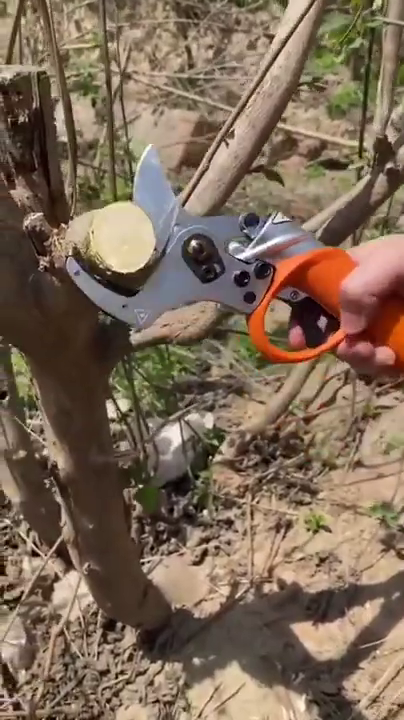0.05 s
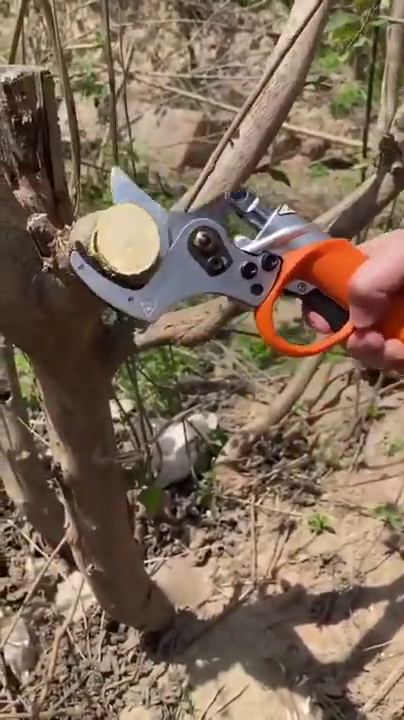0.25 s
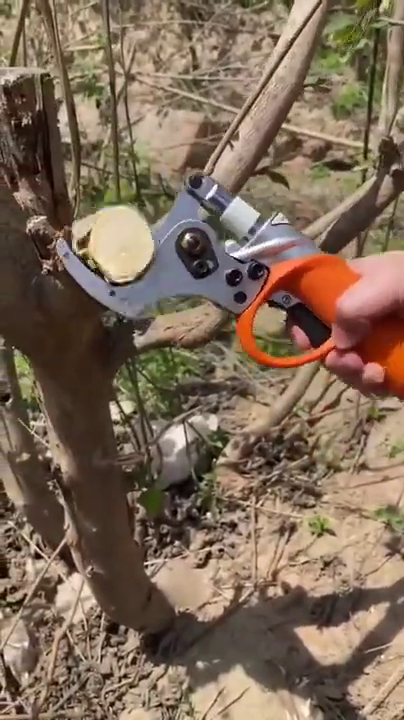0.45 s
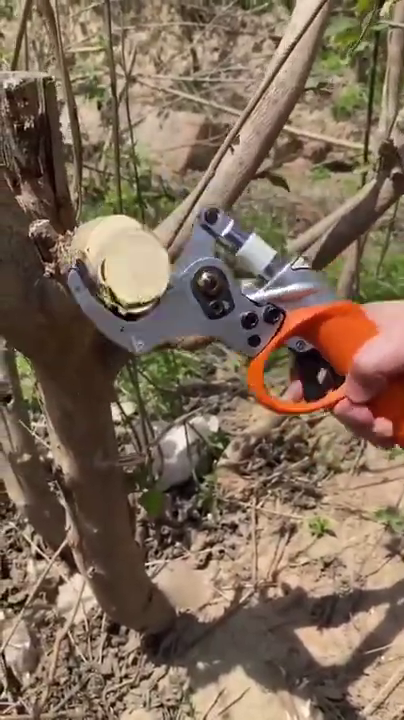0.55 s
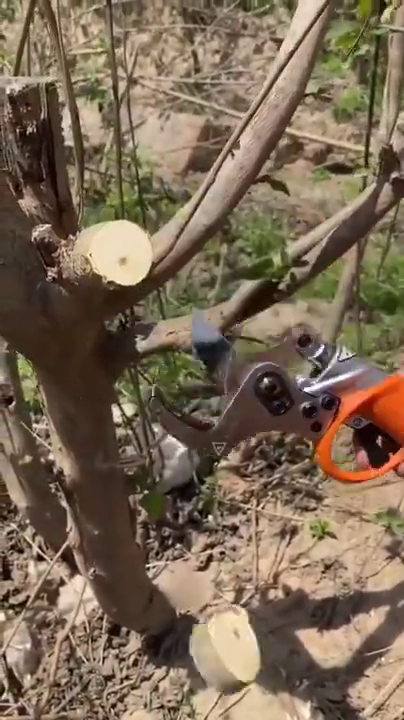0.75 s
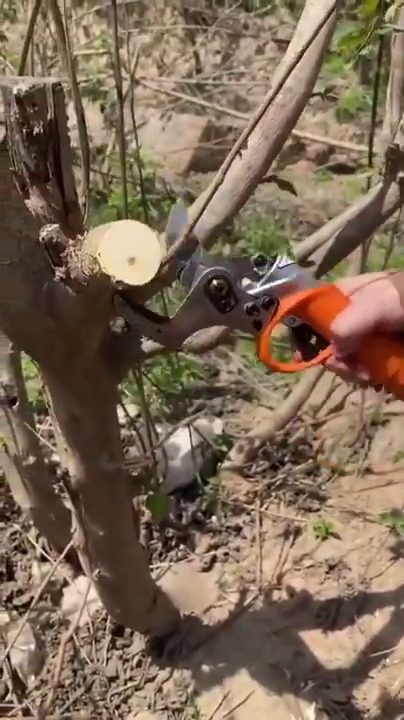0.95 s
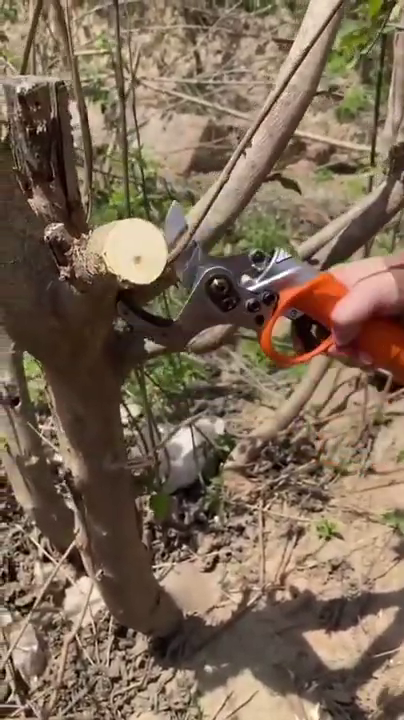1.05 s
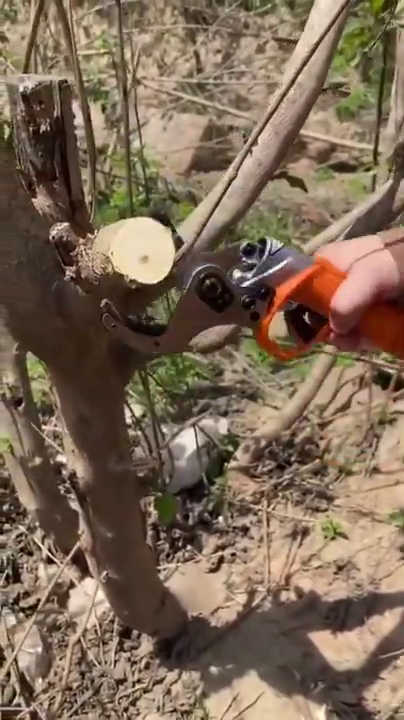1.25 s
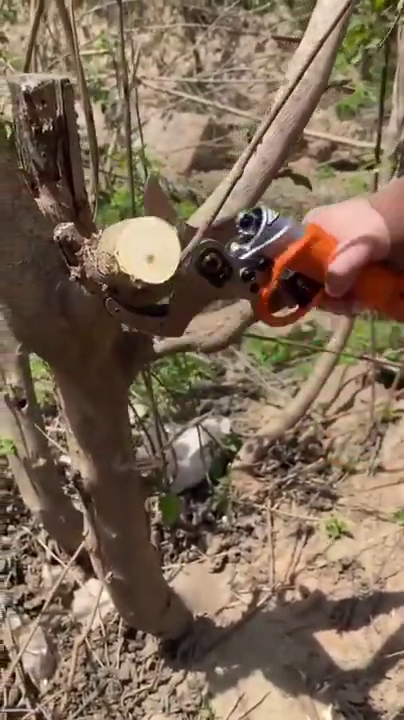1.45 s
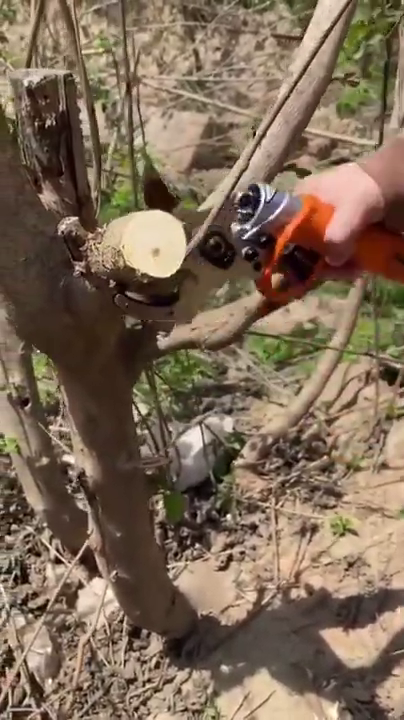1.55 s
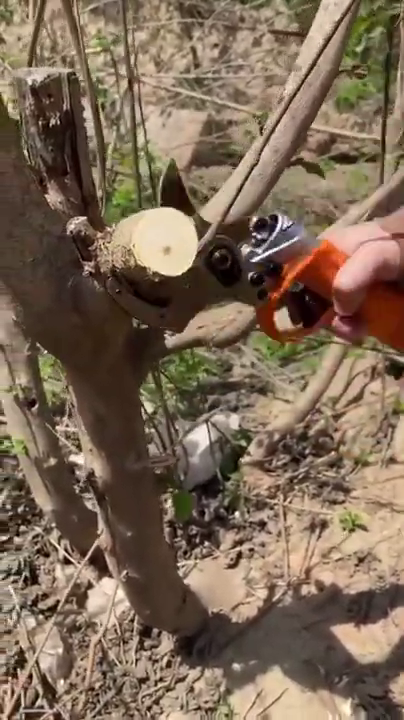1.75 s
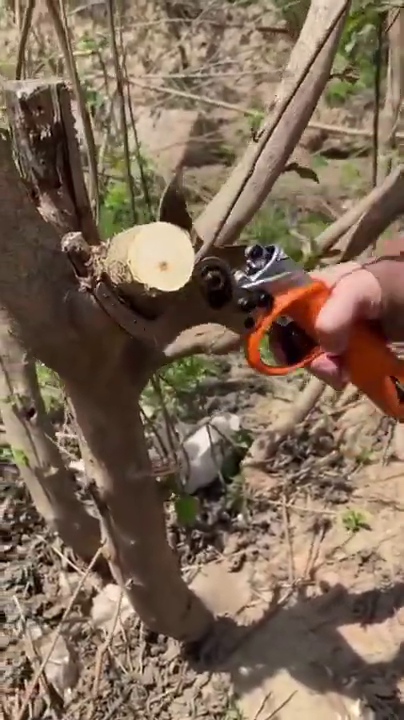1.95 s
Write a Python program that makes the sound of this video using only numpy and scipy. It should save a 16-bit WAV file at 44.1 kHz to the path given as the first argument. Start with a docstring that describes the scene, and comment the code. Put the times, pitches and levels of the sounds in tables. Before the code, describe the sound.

Close by outdoors, a motorised pruner closes with a gear whir and a sinking squeal, snaps the last wood fibres and runs open again. Faint knocks and crunches follow as the cut piece lands on dry ground.

```python
"""An electric pruning shear, close by and outdoors, cuts a stub off a branch. Gear teeth whir in a ringing
housing, the drive whines, the blade sticks and slips in the wood with a sinking squeal, the last fibres
crack, and the blades rub as they run back open. The offcut thuds on dry soil and tumbles, spraying crumbs;
dry litter rustles faintly over a low outdoor rumble."""
import sys
import numpy as np
from scipy.fft import rfft, irfft, next_fast_len
from scipy.io import wavfile
from scipy.ndimage import map_coordinates

SR = 44100
rng = np.random.default_rng(int(sys.argv[2]) if len(sys.argv) > 2 else 0)


def master(y):
    """Save y as 16-bit WAV."""
    cut = np.clip(np.atleast_2d(y).T, -1, 1)
    pcm = np.round(cut * 32767)  # scale
    wavfile.write(sys.argv[1], SR, pcm.astype(np.int16))


N = 88200

# housing resonances (frequency [Hz], width [Hz], gain [dB])
HOUSING_MODES = [(1660, 120, -6), (2154, 200, -2), (2660, 60, -2), (3040, 140, 0.5), (3180, 45, -11.5),
                 (3890, 220, -3.5), (4280, 55, -3), (4670, 230, -1), (6000, 190, -6), (7450, 130, -1.5),
                 (7900, 110, -2.5), (7730, 130, -0.5), (10180, 50, 1)]
# motor drive tones (frequency [Hz], relative level [dB])
DRIVE_TONES = [(8441, -15.5), (10163, -24.5), (14298, -24.5), (15331, -36.5)]
# (frequency [Hz], left-right correlation [-1..1])
SHEAR_COHERENCE = [(100, .85), (300, 0.95), (640, -.1), (1400, -0.067), (2600, 0.46), (6800, 0.44),
                   (15000, 0.68)]
MESH_HZ, SHAFT_HZ = 799.6, 85.55

def gears(stroke, spectrum, jitter, size_db, hiss_db, shaft_db, ring_db, whine_db):
    """Teeth strike unevenly over sliding noise, pulsing with the shaft; housing rings, drive whines."""
    t, count = clock(), 2400
    strikes = (np.arange(count) + jitter * rng.standard_normal(count)) * SR / MESH_HZ
    sizes = amp(size_db * rng.standard_normal((2, count))) * rng.choice([-1, 1], (2, count))
    teeth = np.array([np.bincount(np.abs(strikes).astype(int), row, N)[:N] for row in sizes])
    shaft = np.sin(2 * np.pi * np.cumsum(SHAFT_HZ * (1 + .055 * wobble(25))) / SR)
    sliding = amp(hiss_db) * rng.standard_normal((2, N))
    force = (unit(teeth) + sliding) * amp(shaft_db * shaft + .8 * wobble(130))
    housing = lambda hz: amp(along(spectrum, hz)) * (1 + amp(ring_db) * resonances(HOUSING_MODES, hz))
    whir = stereo(force, housing, SHEAR_COHERENCE)
    whine = sum(amp(db + 2 * wobble(4.7)) * np.sin(2 * np.pi * hz * t + .3 * wobble(23))
                for hz, db in DRIVE_TONES)
    return amp(curves(stroke)[0]) * during(stroke) * (whir + amp(whine_db) * whine)


# (time [s], level [dB])
CLOSING_STROKE = [(.175, -65), (.192, -39), (.203, -38), (.213, -19.5), (.235, -21), (.33, -20), (.45, -21),
                  (.546, -20), (.556, -38.5), (.594, -39.5), (.605, -73.5), (.62, -85)]
OPENING_STROKE = [(.603, -54.5), (.617, -43), (.624, -38.5), (.638, -34), (.644, -24), (.7, -25.5),
                  (.75, -25.5), (.815, -27), (.86, -24), (.89, -29), (.92, -33), (.94, -57.5), (.99, -80)]
# (frequency [Hz], density [dB])
LOADED_SPECTRUM = [(40, -47), (130, -29.5), (300, -13.5), (800, -12.5), (960, -36), (1150, -9.5),
                   (1600, -3), (2400, 2.5), (3200, 2.5), (4000, -1), (4350, -1), (4700, 1.5), (5250, -3.5),
                   (5900, 0.5), (6600, -3.5), (7600, 1), (8400, -11.5), (10200, -11), (12500, -6),
                   (13700, -22.5), (14200, -31.5), (16000, -51.5)]
FREE_SPECTRUM = [(120, -25), (200, -9.5), (366, -10), (432, -0.5), (623, -10), (806, -1), (916, -16),
                 (1740, -1), (2130, 1), (2420, -6), (3020, -1.5), (4200, -0.5), (5840, -9.5), (7410, -1),
                 (8580, -19.5), (9060, -19.5), (9930, 1), (10500, -5), (12800, -3.5), (14900, -35),
                 (16000, -74)]

def gear_strokes():
    """The gears close the blade under load, then run free to open it."""
    closing = gears(CLOSING_STROKE, LOADED_SPECTRUM, jitter=.12, size_db=2.5,
                    hiss_db=-2.5, shaft_db=.5, ring_db=-5, whine_db=-3.5)
    opening = gears(OPENING_STROKE, FREE_SPECTRUM, jitter=.093, size_db=.5,
                    hiss_db=2, shaft_db=-1.4, ring_db=1.5, whine_db=-7)
    return closing + opening


def stick_slip(stroke, roughness, flutter_db, scatter_db):
    """Steel sticks and slips: a stuttering tone and its octave, rougher at high pitch."""
    hz, *levels_db = curves(stroke)
    jitter = roughness * (hz / 3000) ** 1.535
    out = np.zeros((2, N))
    for harmonic, db in enumerate(levels_db, 1):
        slip = lambda: np.sin(2 * np.pi * harmonic * np.cumsum(hz * (1 + jitter * wobble(1100))) / SR)
        tone = slip() + amp(scatter_db) * np.array([slip(), slip()])
        flutter = amp(flutter_db * np.tanh(wobble(210)))
        out += amp(db) * during(stroke) * unit(tone * flutter)
    return out


# (time [s], pitch [Hz], fundamental [dB], octave [dB])
CUT_SQUEAL = [(.205, 3612, -50, -46), (.232, 3815, -22.5, -20), (.26, 3744, -24, -20.5),
              (.3, 3474, -25, -19), (.335, 3200, -20, -22.5), (.37, 2914, -25, -25.5),
              (.41, 2896, -23.5, -26.5), (.455, 2725, -19.5, -28), (.515, 2940, -25, -35.5),
              (.545, 2934, -23.5, -46), (.56, 2870, -51.5, -58)]
PARTING_RUB = [(.625, 2907, -34, -60.5), (.648, 2990, -29.5, -42), (.7, 3650, -30.5, -44),
               (.75, 3740, -47, -48.5), (.82, 4120, -39.5, -55), (.87, 3790, -40, -36),
               (.92, 3690, -52, -57)]

def blade_squeals():
    """The squeal sinks as the blade bites deeper; the blades rub as they part."""
    cutting = stick_slip(CUT_SQUEAL, roughness=.04, flutter_db=3, scatter_db=-8)
    parting = stick_slip(PARTING_RUB, roughness=.08, flutter_db=1.5, scatter_db=-12)
    return cutting + parting


# (frequency [Hz], width [Hz], level [dB])
BLADE_MODES = [(4540, 93, -25.5), (8480, 12, -32)]
# (time [s], length [s], pitch [Hz], level [dB])
SQUEAKS = [(0.3666, 0.0081, 2920, -16), (0.3786, 0.011, 5745, -14), (.385, 0.005, 5770, -14),
           (0.3853, .006, 2900, -16), (0.398, 0.012, 5780, -15), (0.506, 0.011, 2997, -16.5),
           (0.521, 0.01, 2945, -16)]

def blade_song():
    """The steel sings in its own modes at peak load and squeaks cleanly where it sticks hardest."""
    w = 2 * np.pi * clock()
    modes = sum(amp(db) * (wobble(2 * width) * np.sin(w * hz) + wobble(2 * width) * np.cos(w * hz))
                for hz, width, db in BLADE_MODES)
    squeaks = sum(amp(db) * swell(s, length / 1.7) * np.sin(w * hz + .3 * wobble(400))
                  for s, length, hz, db in SQUEAKS)
    return modes * swell(centre_s=.44, half_width_s=.09) + np.sqrt(2) * squeaks


# (time [s], level [dB])
CRACKS = [(.531, -22), (.539, -20), (.546, -19), (.562, -22), (0.573, -22), (.589, -22)]
# (frequency [Hz], density [dB])
FIBRE_SPECTRUM = [(30, -36.5), (90, -3), (200, -6), (400, -1), (950, -12.5), (1600, 6), (2600, 1.5),
                  (4000, -3), (6500, -17), (12000, -25), (16000, -45)]

def fibre_cracks():
    """The last fibres give way in short, woody snaps."""
    snaps = sum(amp(db) * burst(s, attack_s=.00074, t60_s=.043) for s, db in CRACKS)
    return snaps * grit(FIBRE_SPECTRUM, SHEAR_COHERENCE, grains_per_s=5000, noise_db=1)


# ground impacts (time [s], relative click level [dB], relative thud level [dB])
KNOCKS = [(.002, -50.5, -32.5), (.778, -41, -38.5), (1.024, -26.5, -27), (1.0849, -35.5, -49),
          (1.094, -36.5, -48), (1.3246, -25, -41), (1.4266, -35.5, -39.5), (1.441, -43.5, -45)]
# (time [s], relative level [dB])
TICKS = [(0.1942, -28), (0.2109, -21.5), (1.3316, -37.5), (1.46, -49), (1.5327, -56), (1.7276, -47),
         (1.7598, -58), (1.7876, -50)]
# (frequency [Hz], density [dB])
CLICK_SPECTRUM = [(400, -11), (900, -5.5), (1750, 0), (2500, -8), (3400, -0.5), (4900, 0.5), (6200, -9.5),
                  (7200, -4), (8500, -18), (12000, -15), (16000, -25.5)]
# (frequency [Hz], width [Hz], gain [dB])
CLICK_MODES = [(1726, 130, 3.5), (4600, 300, -1.5), (6990, 160, 3)]
# (frequency [Hz], level [dB], t60 [s])
GROUND_MODES = [(89.5, -1.5, .11), (177.1, 0, 0.14), (263, 0.5, 0.062), (318, -5.5, 0.11),
                (377, -3.5, 0.062)]
# (frequency [Hz], left-right correlation [-1..1])
GROUND_COHERENCE = [(60, .9), (180, 1), (550, 0.15), (1650, .15), (4970, 0.43), (15000, 0.48)]

def knocks_and_ticks():
    """A knock is a hard click plus a low ground thud; the mechanism and dry twigs only click."""
    hits = [(s, db) for s, db, _ in KNOCKS] + TICKS
    envelope = sum(amp(db) * burst(s, attack_s=.0012, t60_s=.012) for s, db in hits)
    clicks = envelope * grit(CLICK_SPECTRUM, GROUND_COHERENCE, grains_per_s=6000, noise_db=-5.5)
    thuds = sum(amp(db) * ring(s, GROUND_MODES, attack_s=.006) for s, _, db in KNOCKS)
    return amp(4) * filtered(clicks, lambda hz: 1 + resonances(CLICK_MODES, hz)) + amp(3) * thuds


# (time [s], relative spray level [dB], t60 [s], treble tilt [dB/octave], relative thump level [dB])
CRUNCHES = [(0, -35.5, .14, 2.5, -46), (1.025, -46.5, 0.12, -2.5, -35), (1.08, -32, 0.13, 1, -35.5),
            (1.125, -54, 0.65, 2.5, -59), (1.277, -41, 0.16, 0.5, -57), (1.327, -48.5, 0.097, 2.5, -43),
            (1.427, -45, 0.19, -4.5, -50)]
# (frequency [Hz], density [dB])
SOIL_SPECTRUM = [(200, -2.5), (700, 0), (1300, -11.5), (2600, 5.5), (3800, -4.5), (5000, -0.5), (7000, 0),
                 (10000, -3), (12000, -3), (14500, -10.5), (16000, -20)]
# (frequency [Hz], level [dB], t60 [s])
THUMP_MODE = [(67.2, 3.5, 0.2)]

def soil_crunches():
    """Dry crumbs spray in clumps; the soft ground gives with a thump."""
    sprays = sum(amp(db + 1.5 + 1.8 * wobble(260)) * burst(s, attack_s=.0017, t60_s=t60)
                 * grit(SOIL_SPECTRUM, GROUND_COHERENCE, grains_per_s=1500, noise_db=3, tilt_db=tilt)
                 for s, db, t60, tilt, _ in CRUNCHES)
    thumps = sum(amp(db) * ring(s, THUMP_MODE, attack_s=.0083) for s, *_, db in CRUNCHES)
    return sprays + thumps


# (time [s], length [s], level [dB], treble tilt [dB/octave])
RUSTLES = [(.135, 0.093, -50.5, 3), (1.394, .12, -59.5, 2.5), (1.712, 0.3, -57.5, -1.6),
           (1.786, .06, -58.5, 9), (1.858, 0.1, -60, -4.5)]

def litter():
    """Dry litter rustles in faint, grainy swells."""
    return sum(amp(db + 1.4 * wobble(90)) * swell(s, length / 1.6)
               * grit(SOIL_SPECTRUM, GROUND_COHERENCE, grains_per_s=340, noise_db=3, tilt_db=tilt)
               for s, length, db, tilt in RUSTLES)


# (frequency [Hz], density [dB])
RUMBLE_SPECTRUM = [(15, -43.5), (25, -18.5), (34, -8.5), (50, 1.5), (75, -2), (110, -7), (170, -11),
                   (300, -32.5), (800, -69.5)]
HISS_SPECTRUM = [(60, -26), (130, -1), (210, -1), (440, -3), (900, -14.5), (1440, -20), (2600, -23.5),
                 (5100, -29), (6300, -32.5), (14400, -28), (16000, -38)]
# (frequency [Hz], left-right correlation [-1..1])
RUMBLE_COHERENCE = [(60, .92)]
# (time [s], level [dB])
HISS_LEVEL = [(0, -50.5), (.09, -57), (.16, -73), (.22, -53.5), (1, -53.5), (1.5, -54.5), (2, -56)]
RUMBLE_DB = -52.5

def outdoor_air():
    """Low rumble and a faint hiss that dips briefly."""
    def noise(spectrum, coherence):
        return stereo(rng.standard_normal((2, N)), lambda hz: amp(along(spectrum, hz)), coherence)
    rumble = amp(RUMBLE_DB + .8 * wobble(7)) * noise(RUMBLE_SPECTRUM, RUMBLE_COHERENCE)
    hiss = amp(curves(HISS_LEVEL)[0] + 1.3 * wobble(10)) * noise(HISS_SPECTRUM, GROUND_COHERENCE)
    return rumble + hiss


# (delay [s], gain [dB])
ECHOES = [(.0012, -19.5), (.00345, -17), (.00433, -15.5), (.0056, -15.5), (.0079, -14.5), (.0088, -16.5)]

def with_echoes(x):
    """Direct sound plus reflections off hand, trunk and ground."""
    return filtered(x, lambda hz: 1 + sum(amp(db) * np.exp(-2j * np.pi * hz * s) for s, db in ECHOES))


def amp(db):
    """Decibels to gain."""
    return 10 ** (np.asarray(db) / 20)


def unit(x):
    """Scale to rms 1."""
    return x / np.sqrt(np.mean(x ** 2) + 1e-20)


def clock():
    """Sample times in seconds."""
    return np.arange(N) / SR


def along(points, hz):
    """Interpolate on a log frequency axis."""
    knots_hz, values = np.transpose(points)
    return np.interp(np.log(hz + 1), np.log(knots_hz + 1), values)


def curves(rows):
    """One value per sample for each column after the time."""
    times_s, *columns = np.transpose(rows)
    return [np.interp(clock(), times_s, column) for column in columns]


def during(rows):
    """True between the first and last row."""
    return (clock() >= rows[0][0]) & (clock() <= rows[-1][0])


def wobble(knots_per_s):
    """Smooth random curve."""
    return map_coordinates(rng.standard_normal(8192), [clock() * knots_per_s], mode="wrap")


def filtered(x, response):
    """Apply a frequency response."""
    size = next_fast_len(N + SR // 2)
    return irfft(rfft(x, size) * response(np.fft.rfftfreq(size, 1 / SR)), size)[..., :N]


def stereo(pair, colour, coherence):
    """Colour and mix two unrelated signals to stereo, rms 1."""
    angle = lambda hz: np.arccos(np.clip(along(coherence, hz), -.99, .99)) / 2
    mid, side = filtered(pair, lambda hz: colour(hz) * [np.cos(angle(hz)), np.sin(angle(hz))])
    return unit(np.array([mid + side, mid - side]))


def grit(spectrum, coherence, grains_per_s, noise_db, tilt_db=0):
    """Grains of random size on a bed of noise."""
    grains = rng.standard_normal((2, N)) * (rng.random(N) < grains_per_s / SR)
    pair = unit(grains) + amp(noise_db) * rng.standard_normal((2, N))
    colour = lambda hz: amp(along(spectrum, hz) + tilt_db * np.log2(np.maximum(hz, 500)))
    return stereo(pair, colour, coherence)


def burst(start_s, attack_s, t60_s):
    """Quick rise, exponential fall."""
    age_s = np.maximum(clock() - start_s, 0)
    return (1 - np.exp(-age_s / attack_s)) * 1000. ** (-age_s / t60_s)


def swell(centre_s, half_width_s):
    """Gaussian hump."""
    return np.exp(-2 * ((clock() - centre_s) / half_width_s) ** 2)


def ring(start_s, modes, attack_s):
    """Damped modes, slightly detuned at every blow."""
    return sum(amp(db) * burst(start_s, attack_s, t60)
               * np.sin(2 * np.pi * hz * (1 + .015 * rng.standard_normal()) * (clock() - start_s))
               for hz, db, t60 in modes)


def resonances(modes, hz):
    """Summed response of band-pass modes."""
    return sum(amp(db) * 1j * hz * width / (centre ** 2 - hz ** 2 + 1j * hz * width)
               for centre, width, db in modes)


# (frequency [Hz], left minus right [dB])
SHEAR_PAN = [(200, 2), (700, 1.5), (1290, 10), (2380, 0.5), (4400, -3), (8100, 0.5), (15000, -.5)]

def scene():
    """The shear close in front, the ground below it."""
    shear = amp(-.88) * with_echoes(gear_strokes() + blade_squeals() + fibre_cracks()) + blade_song()
    panned = filtered(shear, lambda hz: amp(np.outer([.5, -.5], along(SHEAR_PAN, hz))))
    return panned + knocks_and_ticks() + with_echoes(soil_crunches() + litter()) + outdoor_air()


# (frequency [Hz], gain [dB])
TREBLE_NOTCH = [(8450, -0.5), (8750, -4.5), (8950, -26.5), (9300, -23.5), (9650, -1)]
BAND_LIMIT_HZ = 15900

def record(dry):
    """A narrow notch near 9 kHz and a cut of the highest treble."""
    return filtered(dry, lambda hz: amp(along(TREBLE_NOTCH, hz)) * (hz < BAND_LIMIT_HZ))


dry = scene()
out = record(dry)
master(out)
```